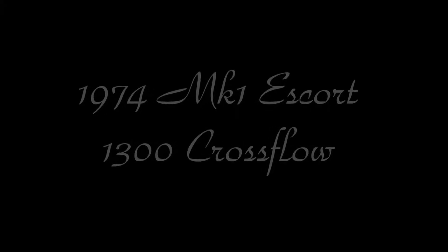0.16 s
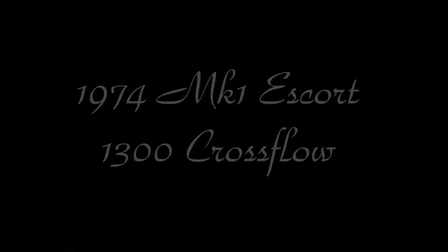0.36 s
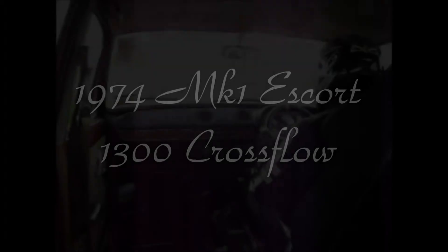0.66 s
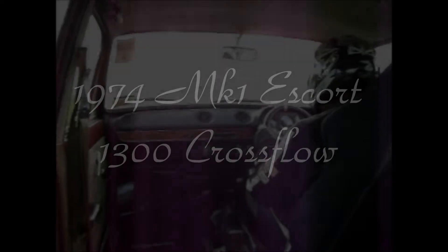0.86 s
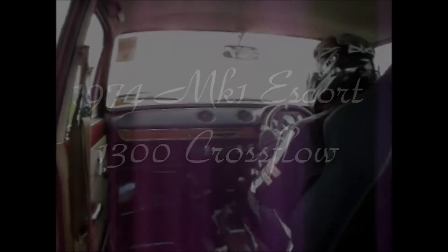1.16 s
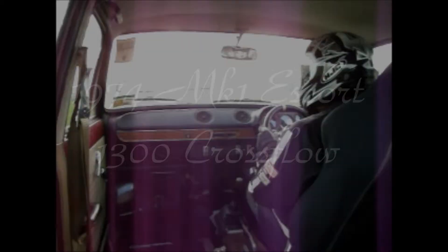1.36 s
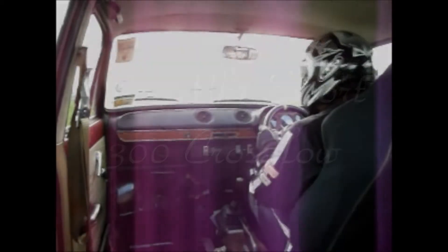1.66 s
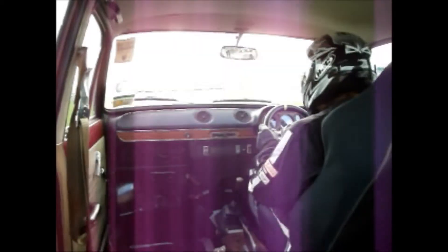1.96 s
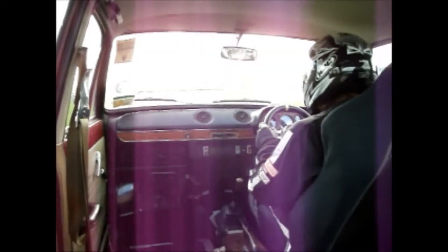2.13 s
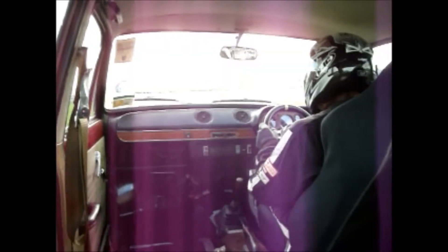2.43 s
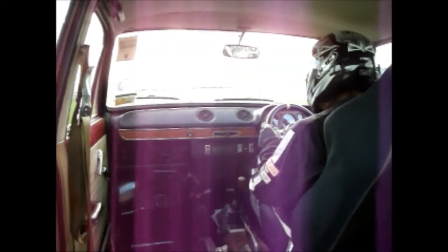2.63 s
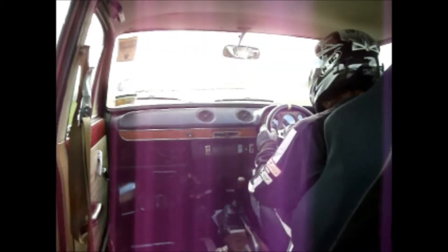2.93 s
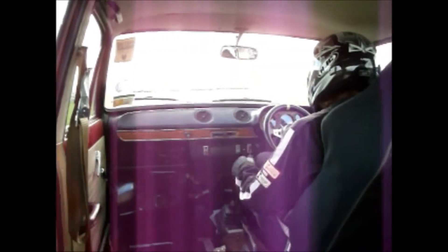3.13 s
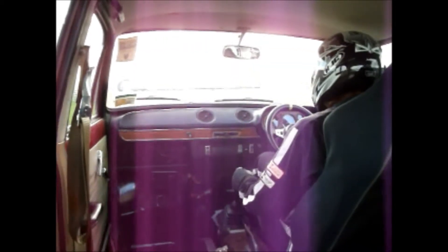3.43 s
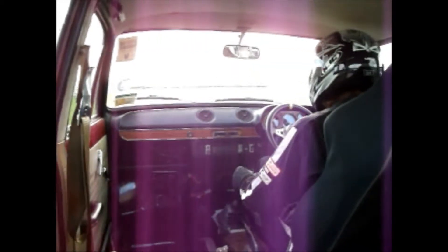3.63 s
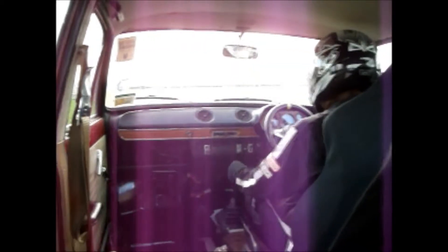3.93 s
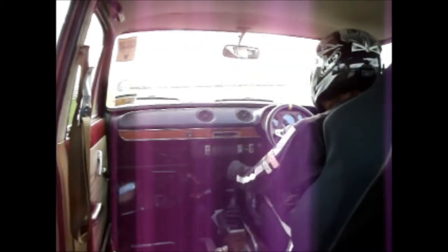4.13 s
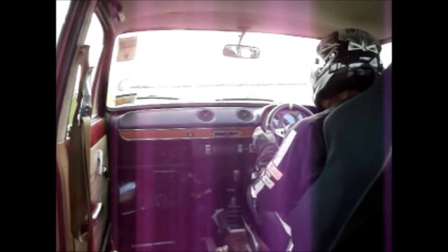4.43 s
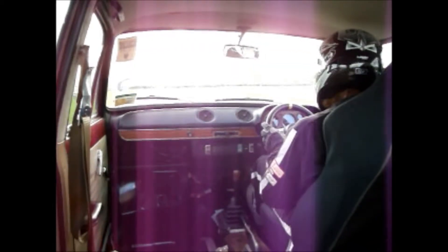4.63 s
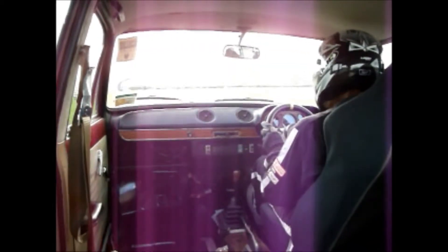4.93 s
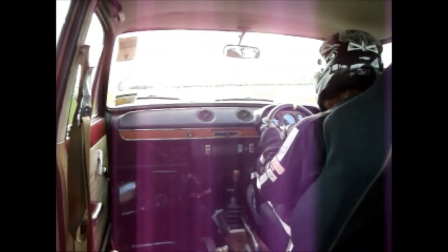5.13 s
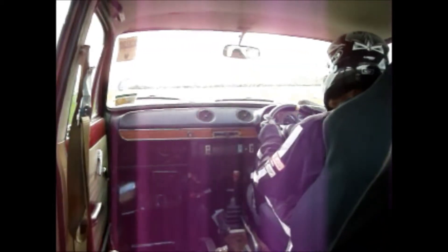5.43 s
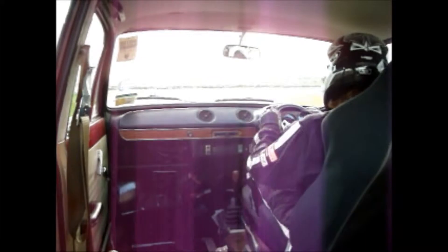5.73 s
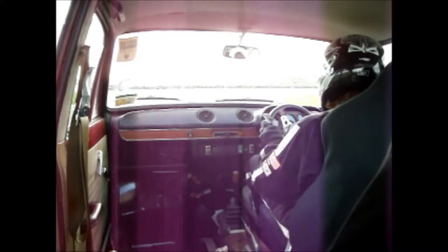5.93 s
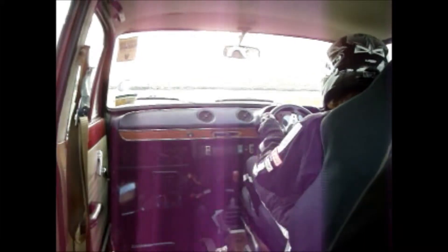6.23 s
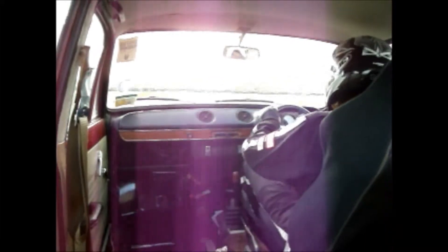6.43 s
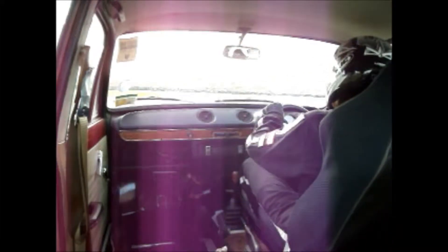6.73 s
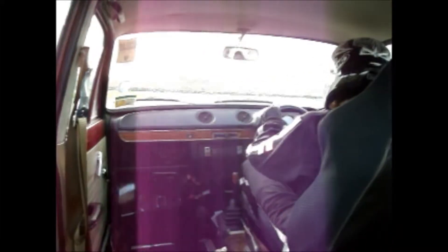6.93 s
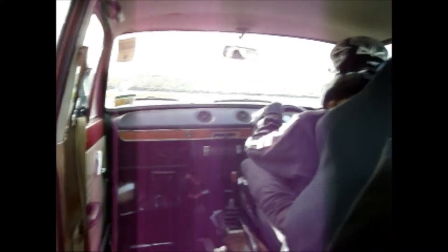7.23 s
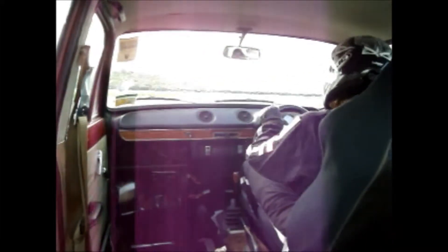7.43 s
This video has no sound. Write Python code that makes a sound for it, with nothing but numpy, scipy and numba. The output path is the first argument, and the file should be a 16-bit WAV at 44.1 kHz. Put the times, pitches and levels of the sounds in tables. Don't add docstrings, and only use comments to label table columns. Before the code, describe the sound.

Inside a stripped racing car, engine drone and fluttering wind overload a cheap microphone; the car slows, blips down a gear and slides with squealing tyres.

```python
import sys
import numpy as np
from scipy import signal
from scipy.fft import rfft, irfft
from scipy.io import wavfile
from scipy.ndimage import uniform_filter1d
from numba import njit

SR = 44100
rng = np.random.default_rng(int(sys.argv[2]) if len(sys.argv) > 2 else 0)


def level_to_linear(level):
    exponent = np.asarray(level, float) / 20
    return 10 ** exponent


def put_to_file(sound):
    columns = np.atleast_2d(sound).T
    safe = np.clip(columns, -1, 1)
    whole_steps = np.round(safe * 32767)
    wavfile.write(sys.argv[1], SR, whole_steps.astype(np.int16))


N = 333837


def level(x, db):
    return x * level_to_linear(db) / np.sqrt(np.mean(x ** 2))


def curves(table):
    time_s, *columns = np.transpose(table)
    return [np.interp(np.arange(N) / SR, time_s, column) for column in columns]


def during(table, fade_s=0.027):
    t = np.arange(N) / SR
    nearest_end_s = np.minimum(t - table[0][0], table[-1][0] - t)
    return np.clip(nearest_end_s / fade_s, 0, 1)


def swells(events, edge=2):
    t = np.arange(0, N, 16) / SR
    total = 0
    for centre_s, height_db, length_s in events:
        distance = np.abs(2 * (t - centre_s) / length_s)
        total = total + height_db * np.exp(-np.log(2) * distance ** edge)
    return np.repeat(total, 16)[:N]


def walk(rate_hz):
    hold = int(SR / rate_hz)
    steps = np.repeat(rng.standard_normal(N // hold + 1), hold)
    smooth = uniform_filter1d(uniform_filter1d(steps, hold), hold)[:N]
    return smooth / smooth.std()


def tone(hz):
    turns = np.cumsum(hz) / SR + rng.random()
    return np.sqrt(2) * np.sin(2 * np.pi * turns)


# pitch_hz [Hz], level_db [dB per Hz]
ROAR = [(15, -27), (25, -4), (41, 3), (86, -9), (132, -10.5), (284, -18), (425, -24), (1070, -31.5),
        (1310, -35), (1830, -34), (2940, -42.5), (4510, -46), (5400, -56.5), (7020, -81), (11900, -120)]


def roar(hz, throttle):
    firing = tone(2 * hz)
    pitch_hz, level_db = np.transpose(ROAR)
    bins_hz = np.arange(N // 2 + 1) * SR / N
    colour = level_to_linear(np.interp(np.log(bins_hz + 1), np.log(pitch_hz), level_db))
    out, shared = 0, walk(13)
    for centre_hz in 30 * 2 ** np.arange(0, 8, 2 / 3):
        octaves = np.log2((bins_hz + 1) / centre_hz)
        shape = np.cos(np.pi / 2 * np.clip(octaves * 1.5, -1, 1))
        band = irfft(rfft(rng.standard_normal(N)) * colour * shape, N)
        high = min(centre_hz / 600, 1)
        engine_db = 0.39 * firing + 0.3 * tone(hz) + 1.94 * (throttle + 2.5)
        out = out + band * level_to_linear(high * engine_db + 0.25 * shared + 1.2 * walk(20))
    tinny = np.exp(-((bins_hz - 1685) / 240) ** 2)
    firewall = irfft(rfft(rng.standard_normal(N)) * tinny, N)
    return level(out, -20.5) + np.minimum(throttle, .9) * level(firewall, -39)


# time_s [s], pitch_hz [Hz]
BUFFET_HZ = [(.58, 19.5), (1.6, 17), (2.5, 20.7), (2.9, 15.94), (3.4, 18.4), (4.0, 15.64), (5.4, 18),
             (5.7, 16.7), (7.57, 15.17)]
# centre_s [s], depth_db [dB], length_s [s]
LULLS = [(.685, 3, 0.025), (.743, 7, 0.016), (.793, 10, 0.023), (.843, 4, 0.035), (.963, 7, 0.027),
         (1.167, 6, 0.023), (1.571, 3, 0.062), (1.756, 4, 0.052), (2.065, 6, 0.03), (2.434, 6.5, 0.062),
         (2.903, 4, 0.13), (3.008, 5.5, 0.067), (3.213, 4, 0.032), (3.422, 12, 0.041), (3.477, 7.5, 0.031),
         (3.697, 7, 0.043), (3.791, 5.5, 0.064), (4.04, 7, 0.079), (4.68, 5.5, 0.067), (4.76, 3.5, 0.054),
         (5.175, 5.5, 0.022), (5.463, 3, 0.032), (5.875, 5, 0.13), (6.101, 2.5, 0.045), (6.231, 2.5, .04),
         (6.376, 7.5, 0.031), (6.869, 6, 0.041), (7.059, 3.5, .063), (7.159, 0.5, 0.031),
         (7.448, 2.5, 0.062)]
# centre_s [s], rise_db [dB], length_s [s]
GUSTS = [(0.893, 6.5, 0.034), (1.387, 2.5, 0.15), (1.846, 3, 0.047), (1.99, 2, 0.081), (2.135, 5, 0.047),
         (2.33, 4.9, 0.063), (2.549, 1.5, 0.054), (3.073, 3.5, 0.125), (3.367, 7, 0.21), (3.612, 1, 0.17),
         (3.936, 1.5, 0.13), (4.27, 11.5, 0.043), (4.365, 8.5, 0.064), (4.455, 6.5, 0.072),
         (4.62, 10, 0.096), (4.844, 6, 0.14), (5.05, 5.5, 0.048), (5.098, 5.5, 0.057), (5.22, -1, 0.04),
         (5.572, 0, 0.124), (5.78, 5, 0.06), (6.525, 2.5, 0.061), (6.68, 2, 0.24)]


def buffeting():
    throb_hz = curves(BUFFET_HZ)[0] * (1 + 0.08 * walk(14))
    throb = tone(throb_hz) * level_to_linear(0.37 * walk(22))
    low_band = signal.butter(2, [8, 40], "band", fs=SR, output="sos")
    eddies = signal.sosfilt(low_band, rng.standard_normal(N))
    strength_db = -15.5 + swells(GUSTS) - 1.15 * swells(LULLS)
    return level_to_linear(strength_db) * (throb + level(eddies, -9.5))


# time_s [s], pitch_hz [Hz], level_db [dB]
AXLE = [
    (3.0, 568, -60),
    (3.4, 560, -35),
    (3.8, 550.2, -38),
    (4.35, 530, -40.5),
    (4.7, 485.4, -38.5),
    (5.0, 476, -59),
]


def axle():
    hz, db = curves(AXLE)
    return during(AXLE) * level_to_linear(db + 1.0 * walk(13)) * tone(hz * (1 + 0.02 * walk(40)))


def squeal(table, chirps, jitter, steady):
    hz, db = curves(table)
    hz = hz * (1 + jitter * walk(150) + .009 * walk(14))
    chirp_s = .045
    db = db + swells([(centre_s, rise_db, chirp_s) for centre_s, rise_db in chirps])
    patches = steady + 0.34 * walk(130) + 0.11 * walk(40)
    return during(table) * level_to_linear(db) * patches * (tone(hz) + level_to_linear(-25) * tone(2 * hz))


# time_s [s], pitch_hz [Hz], level_db [dB]
INNER_TYRE = [(5.85, 1390, -36), (6.15, 1365, -35.5), (6.45, 1350, -34), (6.9, 1335, -37),
              (7.2, 1350, -36.5), (7.4, 1370, -30.5), (7.5, 1360, -35)]
OUTER_TYRE = [(5.75, 1506, -43), (5.9, 1497, -35.5), (6.3, 1480, -36.5), (6.7, 1462, -37), (7.0, 1473, -38),
              (7.25, 1468, -29), (7.52, 1458, -35.5)]
REAR_TYRE = [
    (7.1, 1039, -54),
    (7.27, 1092, -39),
    (7.38, 1090, -37),
    (7.46, 1167, -36),
    (7.52, 1140, -70),
]
# centre_s [s], rise_db [dB]
INNER_CHIRPS = [
    (6.02, 4),
    (6.24, 9.05),
    (6.45, 4),
    (6.6, 6.3),
    (6.71, 7),
    (6.87, 4.12),
    (7.07, 9.9),
    (7.17, 5.8),
    (7.36, 3),
]
OUTER_CHIRPS = [
    (5.8, 4.14),
    (5.9, 3),
    (6.11, 3),
    (6.23, 7.1),
    (6.391, 9.6),
    (6.92, 5),
    (7.22, 7.6),
    (7.29, 4),
    (7.37, 9.8),
]


def tyres():
    inner = squeal(INNER_TYRE, INNER_CHIRPS, jitter=0.016, steady=0.47)
    rear = squeal(REAR_TYRE, [(7.46, 2.5)], jitter=0.027, steady=0.63)
    outer = squeal(OUTER_TYRE, OUTER_CHIRPS, jitter=0.011, steady=0.65)
    return level_to_linear(4.5) * (inner + rear + outer)


# time_s [s], crankshaft_hz [Hz], firing_boom_db [dB]
ENGINE = [(.58, 67.3, -28), (1.2, 68.41, -20), (2.98, 70.99, -20), (3.1, 70.56, -31), (3.55, 70.03, -29),
          (3.8, 68.34, -25.5), (4, 63.6, -29), (4.25, 56, -28.5), (4.5, 51.1, -26.5), (4.96, 60.3, -26),
          (5.29, 74.65, -39.5), (5.45, 77.34, -32.5), (5.8, 74.5, -31.5), (6.2, 69.37, -33), (6.5, 68, -27),
          (7.1, 67.45, -28), (7.3, 67.33, -28), (7.57, 68.47, -26.5)]
# time_s [s], throttle_opening [0-1]
THROTTLE = [(.58, 0.69), (1.3, 0.68), (1.6, 0.86), (3.0, 0.9), (3.1, 0.5), (4.2, 0.49), (4.4, 0.6),
            (5.1, .2), (5.3, 0.32), (5.9, 0.6), (6.2, 0.34), (7.05, 0.42), (7.2, 0.9), (7.57, 1)]
# centre_s [s], rise_db [dB], length_s [s]
BLIPS = [
    (5.37, 17, .18),
    (5.49, -6, .05),
    (5.655, 13, .25),
]
# centre_s [s], rise_db [dB], length_s [s]
MOUNT_LOADS = [
    (2.95, 8.5, .12),
    (3.55, 7.5, 0.28),
    (4.0, 1.5, 0.094),
    (5.25, 4.5, .15),
    (5.97, 11.5, 0.29),
    (6.5, 10, 0.49),
    (7.2, 7, .5),
    (7.55, 7, 0.17),
]
# pitch_hz [Hz], width_hz [Hz], level_db [dB]
PANELS = [(568, 12, -41), (628.6, 29, -39), (674, 28, -36), (806, 22, -40.5), (845.5, 29, -44.5),
          (1073, 98, -47), (1640, 100, -49.5), (1869, 64, -46)]


def engine():
    hz, boom_db = curves(ENGINE)
    throttle = np.clip(curves(THROTTLE)[0], .05, 2)
    firing_db = boom_db + swells(BLIPS, edge=5)
    third_db = -35.5 + swells(MOUNT_LOADS)
    fourth_db = -48.5 + 19 * throttle
    hz = hz * (1 + 0.002032 * walk(25))
    out = level_to_linear(-36 + 7.0 * walk(12)) * tone(hz)
    for order, db in enumerate((firing_db, third_db, fourth_db), start=2):
        out = out + level_to_linear(db + 0.9 + 1.7 * walk(30)) * tone(order * hz)
    for order in range(5, 29):
        order_hz = order * hz[::64]
        ring = 0
        for pitch_hz, width_hz, level_db in PANELS:
            ring = ring + level_to_linear(level_db) / (1 + ((order_hz - pitch_hz) / (width_hz / 2)) ** 4)
        ring = np.repeat(ring, 64)[:N]
        out = out + ring * throttle ** 2 * 1.79 * level_to_linear(0.59 * walk(30)) * tone(order * hz)
    return out, hz, throttle


def scene():
    motor, hz, throttle = engine()
    rush_db = 0.49 * swells(LULLS)
    return (level_to_linear(rush_db) * roar(hz, throttle) + buffeting() + axle() + tyres() + motor)[None]


@njit
def gain_control(x, top, lag, fall, rise, most):
    y, log_gain = np.zeros(len(x)), 0.
    for i in range(lag, len(x)):
        y[i] = x[i] * np.exp(log_gain)
        excess = max(min(abs(y[i - lag]), .48) - top, 0.)
        log_gain += rise - fall * excess
        log_gain = min(log_gain, most)
    return y


def top_cut(x):
    return signal.sosfilt(signal.butter(12, 15200, fs=SR, output="sos"), x)


def record(dry):
    ms = SR / 1000
    x = gain_control(dry[0], top=0.19, lag=round(1.1 * ms), fall=2.71 / ms, rise=0.05 / ms, most=0.92)
    x = np.clip(x, -.522, .522)
    narrow = signal.cheby1(10, .3, 5420, fs=SR, output="sos")
    x = signal.sosfiltfilt(narrow, x)
    since_s = np.arange(N) / SR - .5833
    pop = np.exp(-np.maximum(since_s, 0) / .0025)
    x = np.clip(x * (1 - pop) + .3 * pop - .006, -.5, .5) * (since_s >= 0)
    return top_cut(x[None])


dry = scene()
out = record(dry)
put_to_file(out)
```